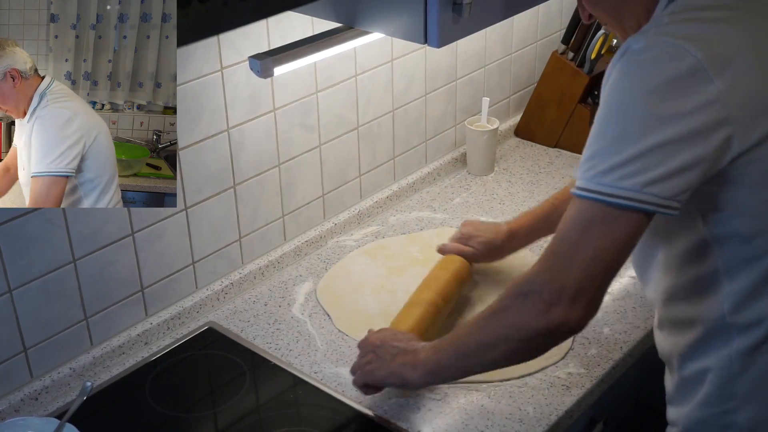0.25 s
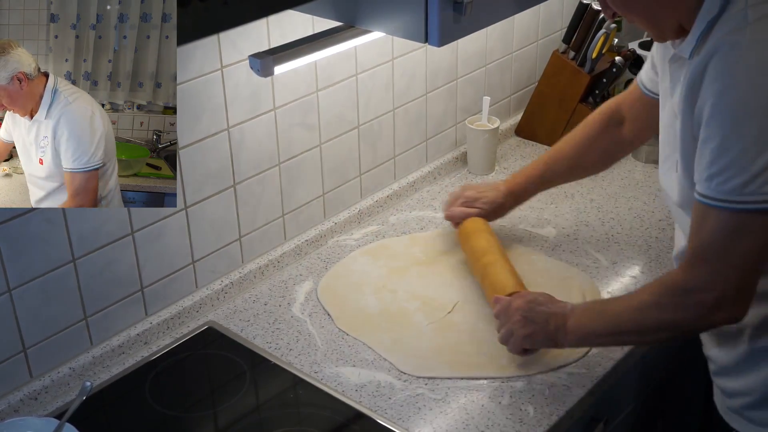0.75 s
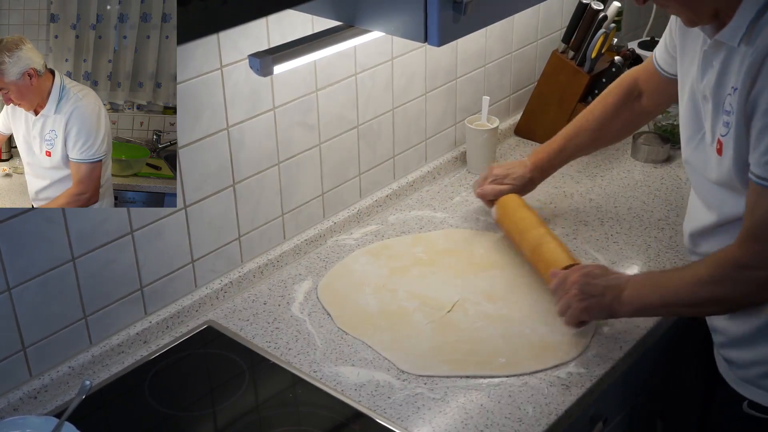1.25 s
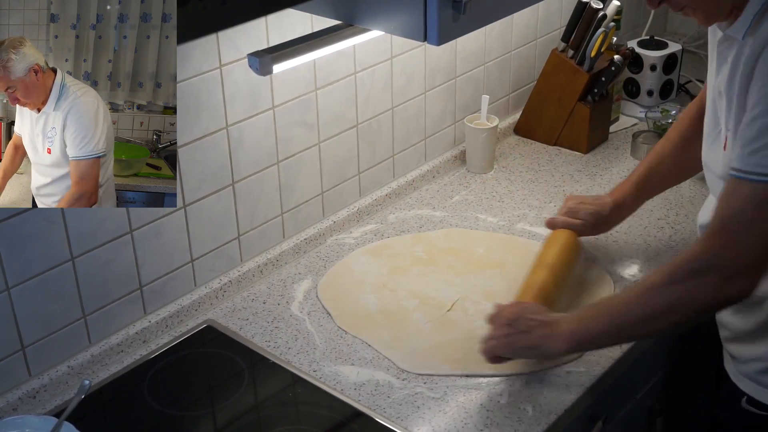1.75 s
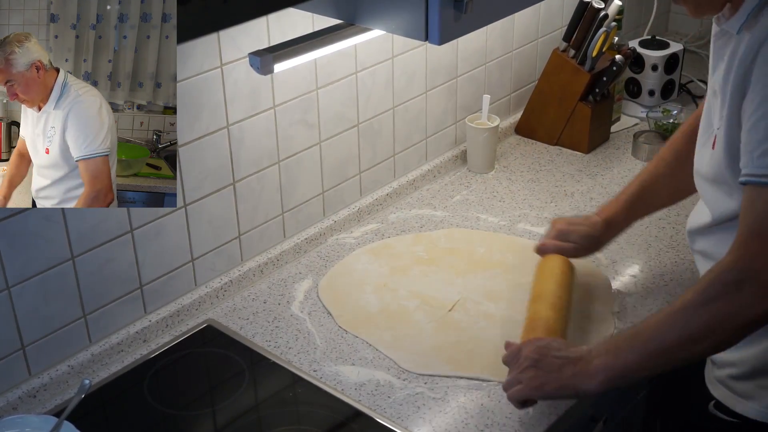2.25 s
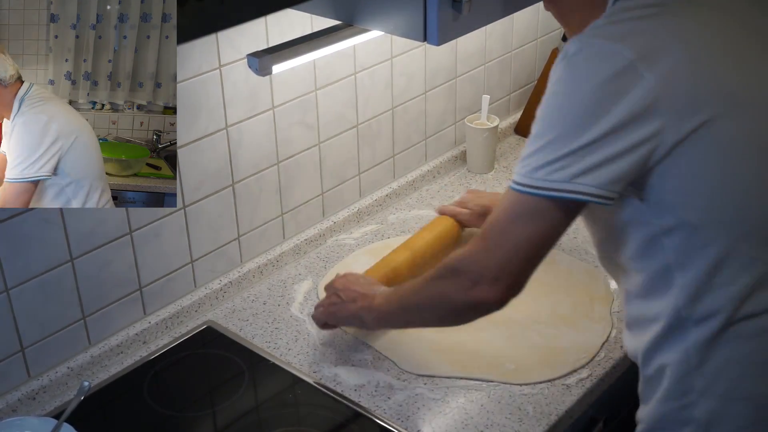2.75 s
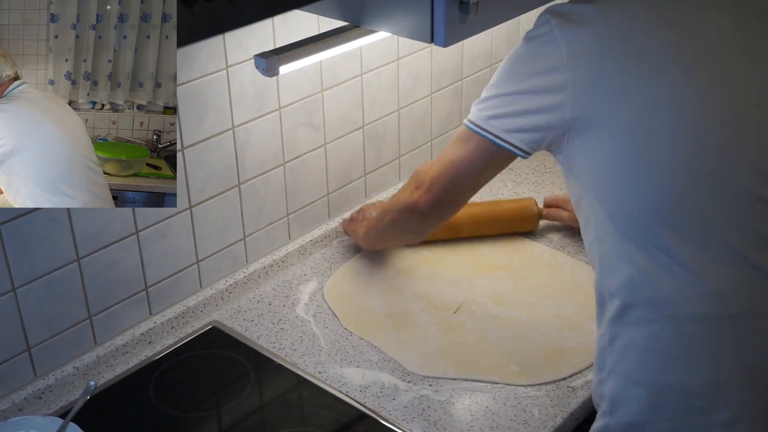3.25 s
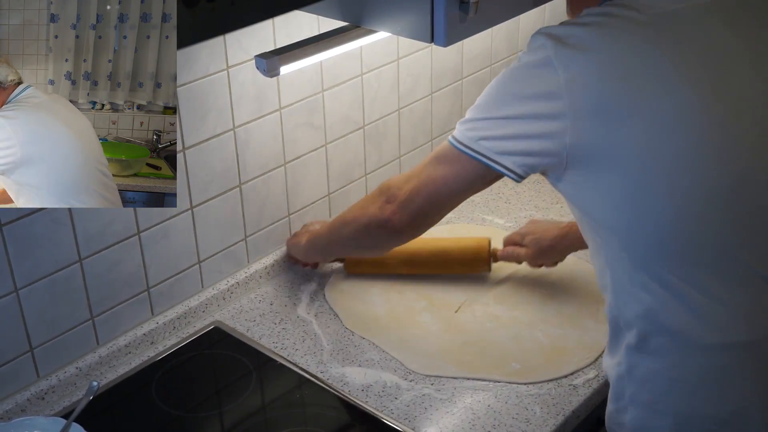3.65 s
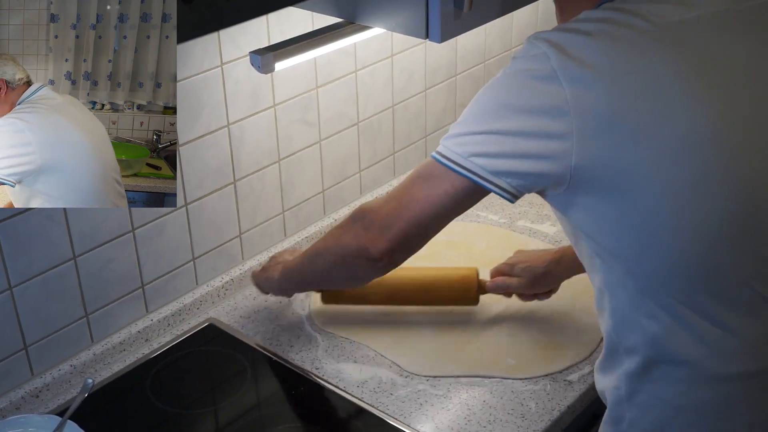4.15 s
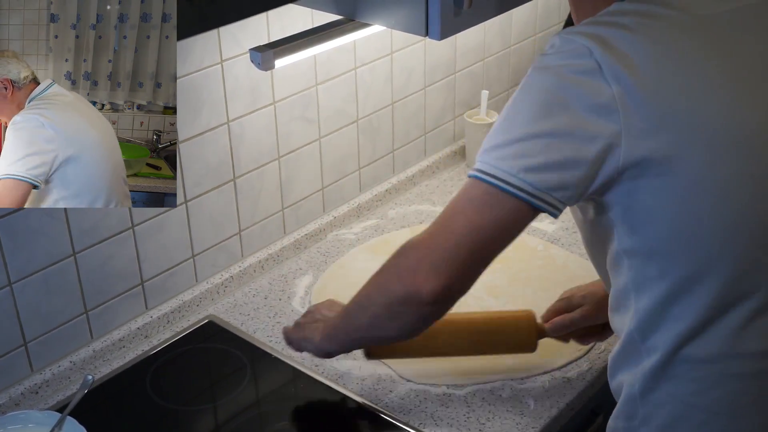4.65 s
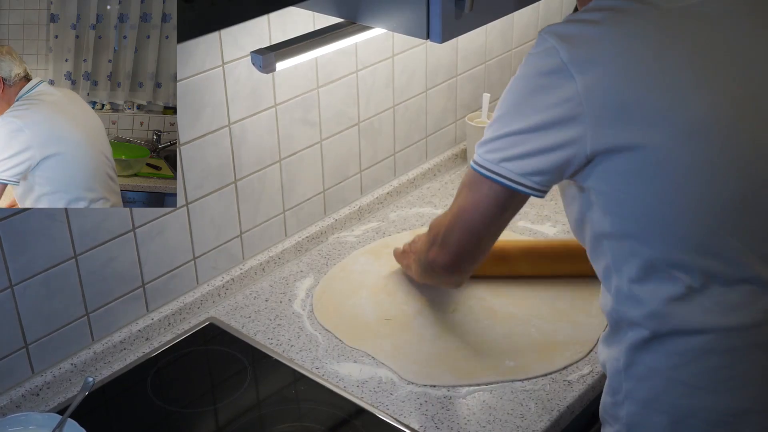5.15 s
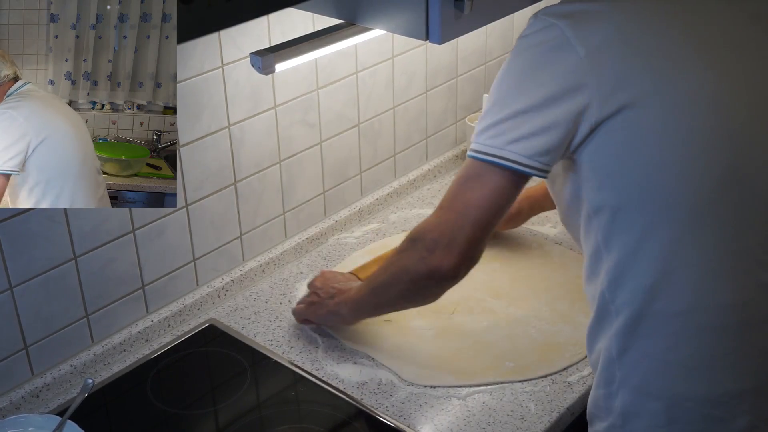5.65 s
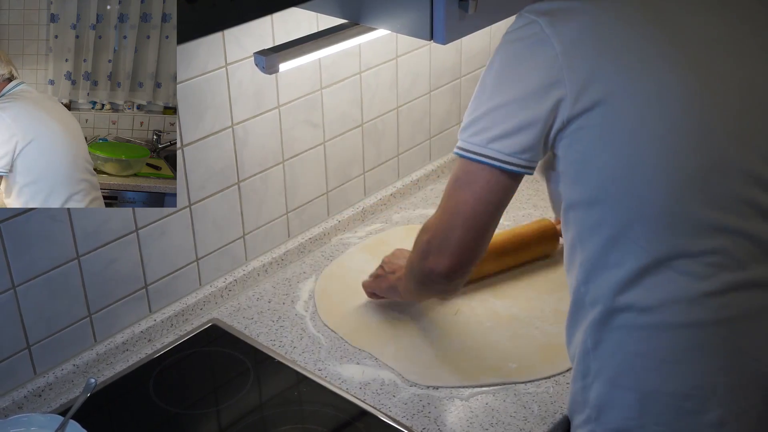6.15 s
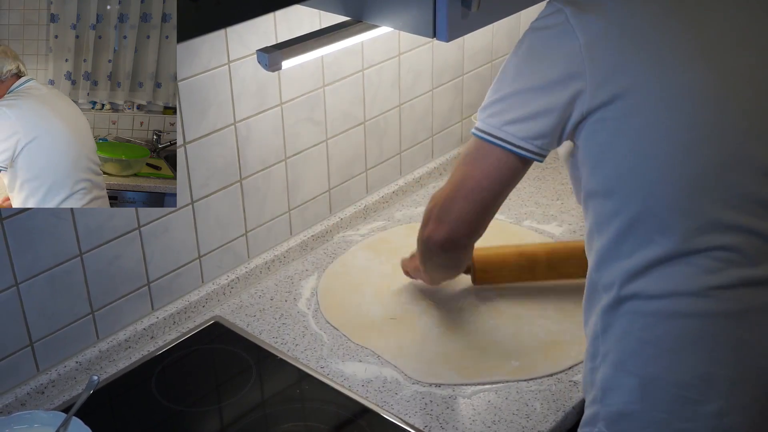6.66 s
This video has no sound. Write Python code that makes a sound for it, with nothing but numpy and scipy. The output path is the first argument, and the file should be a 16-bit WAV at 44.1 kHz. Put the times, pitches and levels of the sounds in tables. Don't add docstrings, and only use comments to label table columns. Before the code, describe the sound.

Heard close on a small stereo camera microphone: quick strokes of a wooden pin on dough, with rattly axle knocks, dull low panel thumps and floury swishes that swell and stop. A brief lull of soft palm and sleeve brushes comes before a sharper snap and clack just after three seconds. More strokes follow evenly to the end, with short tile reflections, quiet room air, appliance hum and a very faint high lamp whine.

```python
import sys
import numpy as np
from scipy import signal
from scipy.fft import rfft, irfft, next_fast_len
from scipy.io import wavfile
from scipy.ndimage import map_coordinates

SR = 44100
rng = np.random.default_rng(int(sys.argv[2]) if len(sys.argv) > 2 else 0)


def undo_db(level):
    steps = np.asarray(level, float) / 20
    return 10 ** steps


def master(y):
    cut = np.clip(np.atleast_2d(y).T, -1, 1)
    pcm = np.round(cut * 32767)
    wavfile.write(sys.argv[1], SR, pcm.astype(np.int16))


N = 304731
TAIL = int(0.55 * SR)
CONTROL_S = np.arange(0, N, 32) / SR

# centre_hz, width_hz, level_db
WORKTOP_MODES = [(88, 71, -22), (126.6, 37, -8), (152.2, 7.4, 3), (196.5, 15.5, 1), (253, 18.3, 1.5),
                 (294, 31, -6.5), (348.2, 39.8, 2.5), (391.8, 61.4, -0.5), (487, 25.4, 5), (571.5, 54, 7.5),
                 (614, 110, 3), (750, 104, 2), (1102, 78, -1.5), (1430, 620, -15.5)]


def roller():
    # start_s, main_mode_db, lowest_modes_db, lower_modes_db, upper_mode_db
    clacks = [(0.024, -59, -47, -55, -63), (0.412, -51, -48, -39, -47), (0.9316, -19, -26.5, -16.5, -24.5),
              (0.9371, -40, -29.5, -22, -40), (1.499, -40.5, -34.5, -35, -46),
              (1.9924, -32.5, -34.5, -27.5, -36), (2.507, -53, -62, -54, -58), (2.9278, -49, -63, -63, -66),
              (3.1804, -25, -31, -15, -21), (3.1874, -16, -29.5, -21.5, -37),
              (3.747, -31, -37.5, -32, -37.5), (3.925, -58, -38.5, -48, -60), (3.9461, -54, -44, -50, -60),
              (4.353, -55, -41.5, -39, -54), (4.503, -48, -41, -46, -56), (5.0819, -36.5, -37, -29.5, -32),
              (5.0886, -27, -32, -24.5, -28.5), (5.3865, -34.5, -40, -32, -29),
              (5.6943, -22.5, -35, -21, -18.5), (5.7009, -33, -37, -23, -42),
              (6.2634, -32, -33.5, -22, -47), (6.7777, -42.5, -46, -42, -54)]
    # centre_hz, width_hz, level_db
    roller_modes = [(1182, 170, -0.5), (1517, 83, -2), (1749, 100, 0), (2038, 84, -4), (2345, 200, -0.5),
                    (2470, 1240, -10), (2708, 33, -4.5), (3010, 100, -4.5), (3108, 71, 2.5),
                    (3390, 62, 7.5), (3664, 120, 1), (4006, 1000, -3), (4900, 150, 7), (5260, 150, -14),
                    (6250, 120, 3), (6840, 190, -9)]
    borders = [1600, 2900, 3250, 4000]
    out = np.zeros((2, N + TAIL))
    for start_s, main_db, lowest_db, lower_db, upper_db in clacks:
        top_db = lower_db - 25.5
        family_db = [lowest_db, lower_db - 2.5, main_db + 0.1, upper_db - 5.5, top_db]
        ring = blow(roller_modes, borders, family_db, chatter=0.52, chatter_s=0.0075)
        add(out, start_s - 0.0008, undo_db(2.5) * ring, wet_db=-0.5)
    return out[:, :N]


def worktop():
    # start_s, middle_modes_db, deep_modes_db, upper_modes_db, slap_db
    thuds = [(0.0244, -42, -41.5, -31.5, -22.5), (0.411, -39, -46, -49.5, -49),
             (0.423, -32.5, -43, -49, -50), (0.93, -24, -58, -29, -31.5), (0.944, -23.5, -38, -27.5, -36),
             (1.152, -32.5, -39, -44, -48), (1.496, -26, -29, -35.5, -54), (1.991, -42, -37, -34, -43),
             (2.004, -30.5, -43, -48, -46), (3.173, -33, -30, -51, -39), (3.19, -27.5, -29, -34.5, -30),
             (3.744, -44, -62, -39.5, -27), (3.939, -58, -56.5, -43, -32), (4.351, -22.5, -32, -27, -41),
             (4.367, -25.5, -30.5, -48, -32.5), (5.081, -43.5, -60, -41.5, -34),
             (5.389, -44, -76, -54, -37), (5.72, -32.5, -37, -39, -36), (5.759, -35.5, -48, -59, -48),
             (6.2531, -18.5, -34, -23.5, -29.5), (6.262, -29.5, -30, -31.5, -26.5),
             (6.269, -20, -46, -51, -25), (6.779, -20, -35.5, -31.5, -53), (6.791, -24.5, -32, -34, -41)]
    borders = [270, 450, 700]
    out = np.zeros((2, N + TAIL))
    for start_s, middle_db, deep_db, upper_db, slap_db in thuds:
        family_db = [deep_db, middle_db + 0.1, upper_db - 6, slap_db - 11.5]
        ring = blow(WORKTOP_MODES, borders, family_db, chatter=0.45, chatter_s=0.01)
        add(out, start_s - 0.001, undo_db(9.5) * ring, wet_db=-3.5)
    return out[:, :N]


def rumble():
    # fullest_s, rumble_db, build_up_s, fade_db_per_s
    rolls = [(0.0, -37, .02, 300), (0.42, -42.5, .03, 67), (0.94, -30.5, 0.034, 500), (1.06, -48, 0.21, 78),
             (1.18, -43, .06, 200), (1.5, -36.5, 0.042, 110), (2.002, -40, 0.014, 110),
             (3.2, -39.5, .04, 150), (3.75, -62.5, 0.043, 25), (4.37, -42, 0.031, 140),
             (5.09, -50, 0.022, 36), (5.75, -39, 0.17, 108), (6.41, -41, 0.16, 300),
             (6.79, -36, 0.039, 184)]
    build_db = 37
    level_db = total(db + peaked(s, build_db / build_s, fade) for s, db, build_s, fade in rolls)
    bumps = undo_db(3 * wobble(30))
    modes = [(hz, width, db - 8 * (hz > 450)) for hz, width, db in WORKTOP_MODES]
    return undo_db(level_db) * bumps * rush(resonances(modes))


def push():
    # frequency_hz, density_db_per_hz
    flour = [(1500, -16.5), (2500, -2.5), (4200, -2), (7500, -3), (10000, -1), (12500, 0), (14500, -3),
             (15800, -3)]
    # frequency_hz, density_db_per_hz
    dull = [(300, -42), (600, -14), (1200, 7), (2500, 4), (4500, -4), (7000, -28)]

    def hiss_colour(hz):
        return undo_db(along(flour, hz))

    def fizz_colour(hz):
        return hiss_colour(hz) / (1 + (10500 / (hz + 1)) ** 4)

    hiss_db, scrape_db = hand_levels()
    grip = wobble(27)
    hiss = undo_db(hiss_db + 0.15 * grip + 0.95 * wobble(90)) * rush(hiss_colour)
    scrape = undo_db(scrape_db + 0.54 * grip) * rush(lambda hz: undo_db(along(dull, hz)))
    fizz_db = -45.5 + 2.3 * (hiss_db + 41.5)
    fizz = undo_db(fizz_db) * rush(fizz_colour)
    return hiss + fizz + scrape


def hand_levels():
    # start_s, speeding_up_s, coasting_s, flour_hiss_db, scrape_over_hiss_db
    strokes = [(-0.1, 0.12, 0.11, -40, -6), (0.405, 0.14, 0.042, -37.5, -8.5), (0.935, .11, 0.1, -39.5, -5),
               (1.485, 0.08, 0.16, -39.5, -7.5), (1.991, 0.12, 0.097, -40, -8),
               (3.19, .12, 0.036, -42, -1.5), (3.74, 0.23, .06, -41.5, -7.5), (4.35, 0.16, 0.038, -42, -5),
               (5.09, .18, .35, -42.5, -4), (5.73, 0.13, 0.019, -40.5, -5), (6.26, 0.13, 0.013, -41.5, -13),
               (6.777, 0.097, .2, -41.5, -5.5)]
    # peak_s, hiss_db, scrape_db, fade_db_per_s
    brushes = [(0.23, -47.5, -64, 248), (0.3, -53, -55, 50), (0.69, -42, -55, 234), (0.86, -55, -76, 80),
               (2.31, -56, -49.5, 250), (2.52, -50.5, -53.5, 300), (2.735, -46.5, -62, 116),
               (2.86, -54, -52.5, 60), (2.935, -50.5, -56, 200), (3.09, -52.5, -60, 116),
               (3.48, -57, -58, 65)]
    # peak_s, hiss_db, scrape_db, fade_db_per_s
    puffs = [(0.932, -41, -66, 200), (3.179, -35, -64, 352), (3.745, -52, -40, 350), (5.079, -37, -44, 280),
             (5.386, -45, -60, 200), (5.695, -44.5, -66, 250), (6.26, -45, -37, 53)]
    scrape_grows = 0.88
    hisses, scrapes = [], []
    for start_s, speed_up_s, coast_s, db, over_db in strokes:
        speed_db, dust_db = stroke(start_s, speed_up_s, coast_s)
        hisses += [db + speed_db, db + dust_db]
        scrapes += [db + over_db + scrape_grows * speed_db, db + over_db + dust_db]
    touches = [(s, db, dull_db, 2.2 * fade, fade) for s, db, dull_db, fade in brushes]
    touches += [(s, db, dull_db, 3000, fade) for s, db, dull_db, fade in puffs]
    for peak_s, db, dull_db, rise, fade in touches:
        shape_db = peaked(peak_s, rise, fade)
        hisses.append(db + shape_db)
        scrapes.append(dull_db + shape_db)
    return total(hisses), total(scrapes)


def stroke(start_s, speed_up_s, coast_s):
    grip_s, start_db = 0.0092, -7.5
    coast_db_per_s, stop_db_per_s = 53, 136
    dust_db, dust_db_per_s = -18.5, 33
    t = CONTROL_S - start_s
    stop_s = speed_up_s + coast_s
    left_db = -coast_db_per_s * coast_s
    times_s = [-2 * grip_s, 0, speed_up_s, stop_s, stop_s + 1]
    speed_db = np.interp(t, times_s, [-60, start_db, 0, left_db, left_db - stop_db_per_s])
    settling_db = np.where(t > 0, dust_db - dust_db_per_s * abs(t - stop_s), -99)
    return speed_db, settling_db


def snaps():
    # start_s, peak_db, centre_hz, width_as_share_of_centre
    releases = [(0.2294, -32, 13000, 0.35), (0.4105, -27, 10800, 0.35), (0.9316, -17.5, 10100, 0.59),
                (1.4865, -31, 13000, 0.35), (1.9934, -30, 13000, 0.35), (2.305, -33, 14600, 0.35),
                (2.5082, -48, 12400, 0.35), (2.7294, -42, 15000, 0.35), (2.9344, -46, 9390, 0.35),
                (3.178, -10, 6300, 0.27), (3.4695, -21.5, 11080, 0.21), (3.744, -29, 11800, 0.57),
                (5.081, -10, 6460, 0.23), (5.0815, -15, 9400, 0.079), (5.1894, -26, 8950, 0.84),
                (5.385, -29, 6120, 0.55), (5.6948, -15, 6400, 0.19), (6.2637, -15, 5840, 0.46),
                (6.775, -47, 13200, 0.35)]
    out = np.zeros((2, N + TAIL))
    for start_s, db, hz, width in releases:
        tick = blow([(hz, width * hz, 0)], [], [0], chatter=0.7, chatter_s=0.002)
        narrowed = filtered(tick, resonances([(hz, 2 * width * hz, 0)]))
        add(out, start_s, undo_db(db - 25) * narrowed, wet_db=3.5)
    return out[:, :N]


def kitchen():
    # frequency_hz, density_db_per_hz
    air_colour = [(15, -63), (25, -42), (97, -76), (145, -23), (242, -10.5), (301, -11.5), (344, -10),
                  (659, 0), (911, -3.5), (1130, -2.5), (2350, -9.5), (5000, -22.5), (8360, -25),
                  (12900, -24), (16000, -24)]
    # centre_hz, width_hz, level_db
    hums = [
        (300.6, 5, -61.5),
        (377.4, 29, -63.5),
        (13000, 62, -69.5),
    ]
    out = undo_db(-50 + 0.085 * wobble(2.5)) * rush(lambda hz: undo_db(along(air_colour, hz)))
    for hz, width, db in hums:
        out = out + undo_db(db) * rush(resonances([(hz, width, 0)]))
    return out


def blow(modes, borders, family_db, chatter, chatter_s):
    t = np.arange(SR // 6) / SR
    rattle = rng.standard_normal(len(t)) * np.exp(-t / chatter_s)
    force = chatter * rattle / np.sqrt(chatter_s * SR)
    force[0] += 1
    struck = [(hz, width, db + family_db[np.searchsorted(borders, hz)]) for hz, width, db in modes]
    body = resonances(struck)

    def bass_cut(hz):
        return (1j * hz / (70 + 1j * hz)) ** 2

    return SR / 600 * filtered(force, lambda hz: body(hz) * bass_cut(hz))


def add(out, start_s, sound, wet_db):
    # frequency_hz, t60_s
    decay = [(80, 0.23), (160, 0.8), (400, 0.46), (800, 0.61), (1500, 0.35), (3200, 0.42), (7000, 0.26),
             (14000, 0.084)]
    hz, t, z = signal.stft(rng.standard_normal((2, TAIL)), SR, nperseg=256)
    fading = z * undo_db(-60 * t / along(decay, hz)[:, None])
    tail = signal.istft(fading, SR, nperseg=256)[1][:, :TAIL]
    first_walls = np.minimum(np.arange(TAIL) / (0.0019 * SR), 1)
    tail = spread(tail * first_walls, np.ones_like)
    tail = undo_db(wet_db) * tail / np.linalg.norm(tail[0])
    tail[[0, 1], [1, 0]] += 1
    heard = signal.fftconvolve(sound[None], tail, axes=1)[:, :TAIL]
    out[:, round(start_s * SR):][:, :TAIL] += heard


def spread(pair, gain):
    # frequency_hz, left_right_likeness
    alike = [(25, .7), (60, 1), (300, 0.94), (700, 0.67), (1500, 0.41), (3000, 0.24), (6000, 0.038),
             (14000, 0.039)]

    def weights(hz):
        turn = np.arccos(np.clip(along(alike, hz), -1, 1)) / 2
        return gain(hz) * [np.cos(turn), np.sin(turn)]

    mid, side = filtered(pair, weights)
    return np.array([mid + side, mid - side])


def rush(gain):
    return unit(spread(rng.standard_normal((2, N)), gain))


def resonances(modes):
    def response(f):
        out = 0
        for k, (hz, width, db) in enumerate(modes):
            damping = 1j * f * width
            out = out + (-1) ** k * undo_db(db) * damping / (hz * hz - f * f + damping)
        return out
    return response


def filtered(x, response):
    m = next_fast_len(x.shape[-1] + 8192)
    spectrum = rfft(x, m) * response(np.fft.rfftfreq(m, 1 / SR))
    return irfft(spectrum, m)[..., :x.shape[-1]]


def total(levels_db):
    power = sum(undo_db(db) ** 2 for db in levels_db)
    return np.interp(np.arange(N) / SR, CONTROL_S, 10 * np.log10(power + 1e-12))


def peaked(peak_s, rise, fade):
    t = CONTROL_S - peak_s
    return np.where(t < 0, abs(rise) * t, -abs(fade) * t)


def wobble(rate):
    knots = rng.standard_normal(int(N * rate / SR) + 4)
    return map_coordinates(knots, [np.arange(N) * rate / SR])


def along(points, hz):
    f, v = np.transpose(points)
    return np.interp(np.log(hz + 1), np.log(f + 1), v)


def unit(x):
    return x / np.sqrt(np.mean(x ** 2) + 1e-20)


def scene():
    return roller() + worktop() + rumble() + push() + snaps() + kitchen()


def roll_off(x):
    return signal.sosfilt(signal.butter(12, 15920, fs=SR, output="sos"), x)


def record(dry):
    heard = filtered(dry, lambda hz: hz < 15900)
    return roll_off(heard)


dry = scene()
out = record(dry)
master(out)
```